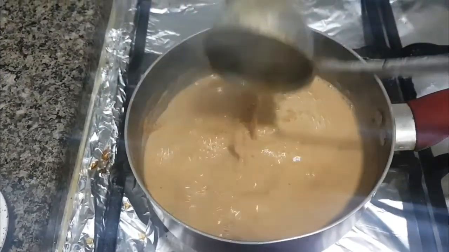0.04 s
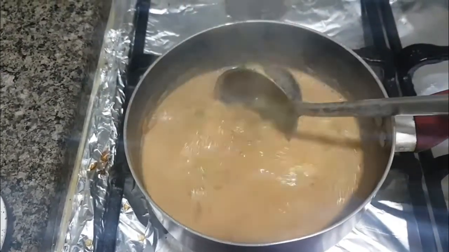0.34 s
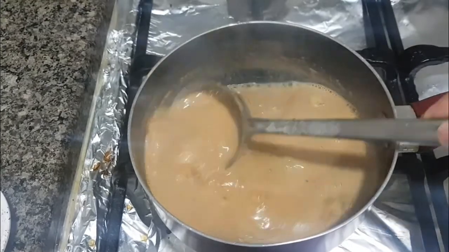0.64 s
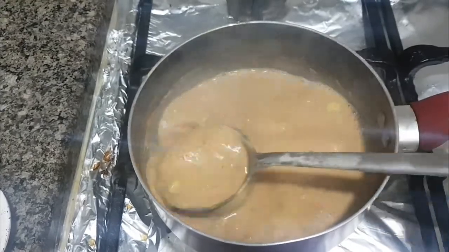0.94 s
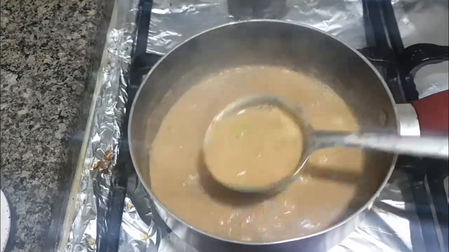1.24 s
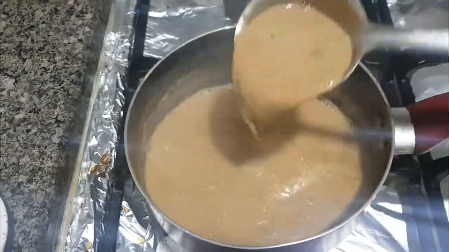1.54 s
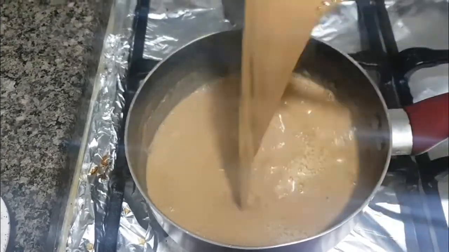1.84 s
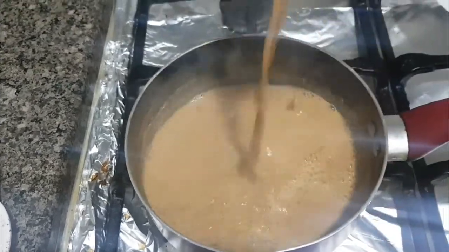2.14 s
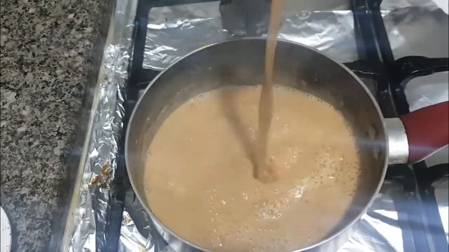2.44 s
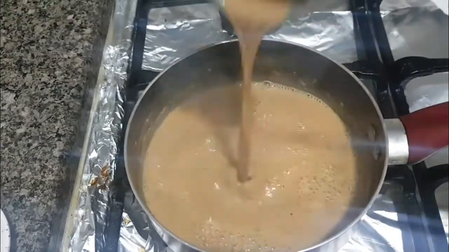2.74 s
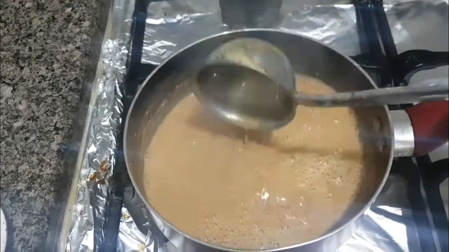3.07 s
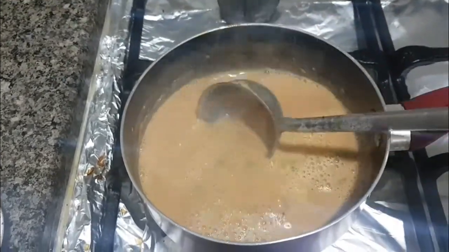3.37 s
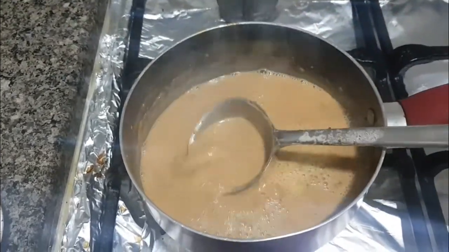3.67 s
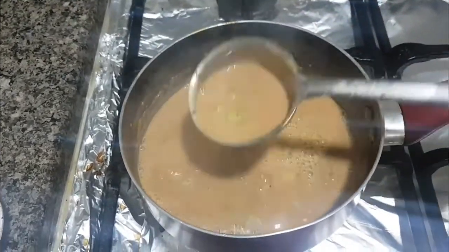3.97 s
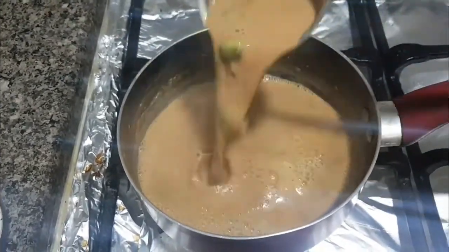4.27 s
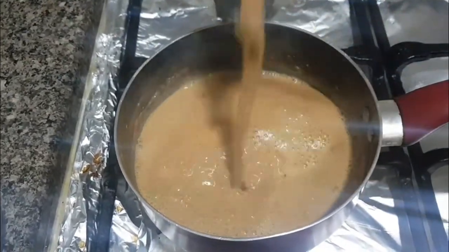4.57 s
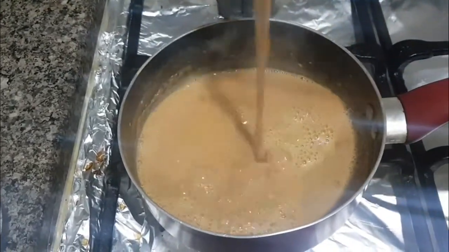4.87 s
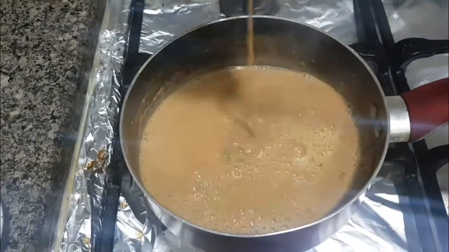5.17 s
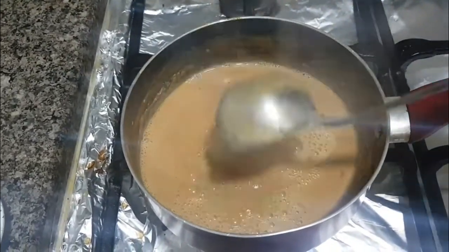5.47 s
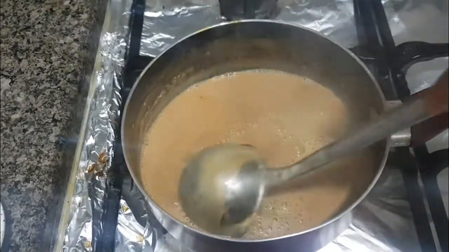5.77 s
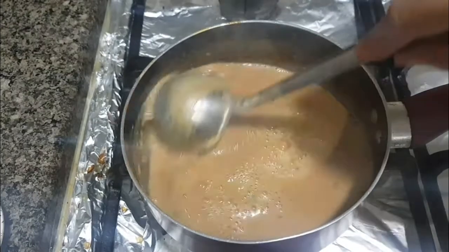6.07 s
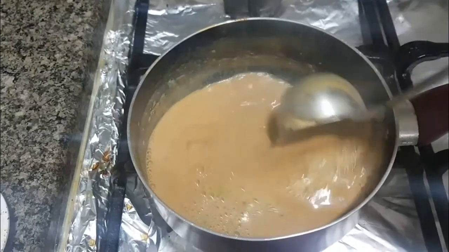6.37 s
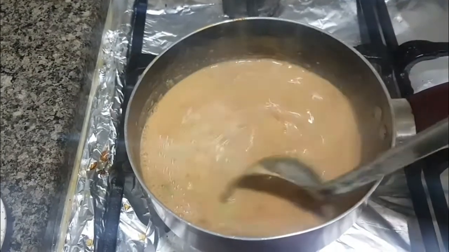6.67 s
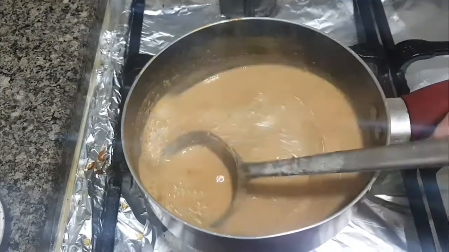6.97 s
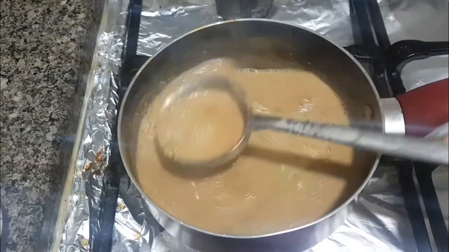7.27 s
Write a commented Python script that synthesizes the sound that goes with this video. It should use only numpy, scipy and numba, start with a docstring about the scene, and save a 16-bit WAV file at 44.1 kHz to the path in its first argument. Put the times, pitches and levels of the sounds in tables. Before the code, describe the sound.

A steel ladle pours liquid back into a pan twice with splashes and plops, then clinks and scrapes, over a faint hum.

```python
"""Milky tea in a hot pan, from a microphone pair just above the stove in a small kitchen.
Over a low hum and the burner's rush, a steel ladle dribbles its last drops and sloshes through the tea.
Near 1.8 s and again near 4.4 s it pours from a height: drops slap the surface and burst into spray,
trapped air fizzes and plops. From 5.9 s the ladle knocks on the pan and its rim scrapes round it,
the tea sloshing behind the bowl."""
import sys
import numpy as np
from scipy import signal
from scipy.fft import rfft, irfft, next_fast_len
from scipy.io import wavfile
from scipy.ndimage import uniform_filter1d
from numba import njit

SR = 44100
rng = np.random.default_rng(int(sys.argv[2]) if len(sys.argv) > 2 else 0)


def waveform_to_disk(signal):
    """Save audio, clipped to [-1, 1], as 16-bit WAV at the path in sys.argv[1]."""
    frames = np.transpose(np.atleast_2d(signal))
    scaled = np.clip(frames, -1, 1) * 32767
    samples = np.round(scaled).astype(np.int16)
    wavfile.write(sys.argv[1], SR, samples)


N = 327001
T = np.arange(N) / SR

# Levels in the tables are relative, ahead of the mix.
# steady hum in the kitchen: (frequency [Hz], level [dB])
HUM = [(44, -49), (100, -50.5), (186, -67), (200, -66.5), (241, -77)]
# spectrum of burner and room air: (frequency [Hz], level [dB])
ROOM_TONE = [(20, -10), (40, -1), (70, 15.5), (90, 8.5), (125, 4), (200, -6), (290, 1), (400, -8.5),
             (800, -7.5), (1200, -11.5), (1900, -24), (2800, -36.5), (6000, -49)]
# a last dribble, then two pours, loudest with the ladle highest:
# (start [s], crest [s], end [s], patter [dB], crackle [dB], spray [dB])
POURS = [(0.014, 0.095, 0.12, -47, -49.5, -52), (1.782, 2.443, 3.04, -47, -54.5, -57.5),
         (4.393, 5.127, 5.347, -46.5, -52, -54)]
# air resonances between tea and pan wall: (frequency [Hz], width [Hz], gain [dB])
PAN_AIR_MODES = [(342, 110, -23), (470, 16.5, 10), (927, 160, -2), (2960, 280, 5.5)]
# the biggest drops hitting the tea: (time [s], slap pitch [Hz], slap [dB], spray [dB])
DROPS = [(0.0386, 1460, -36, -50), (0.069, 1190, -28.5, -47), (0.1082, 1030, -24, -37),
         (.447, 1050, -19, -47), (0.465, 1020, -14.5, -40), (.7874, 790, -33, -70),
         (1.1113, 1980, -31.5, -73), (1.755, 1280, -34.5, -49), (1.8033, 884, -26, -43),
         (1.8789, 1300, -29.5, -35.5), (1.9125, 1530, -31, -34.5), (1.9639, 2120, -25, -37),
         (2.1744, 940, -29, -62), (2.214, 1430, -26, -57), (2.3025, 1300, -30, -29),
         (2.3578, 1090, -26.5, -37), (2.4296, 1060, -24.5, -31), (2.4778, 740, -16.5, -36),
         (2.5257, 796, -22.5, -36), (2.652, 1000, -30, -34), (2.668, 980, -23.5, -41),
         (2.7193, 2000, -36, -29.5), (2.8, 845, -23, -25.5), (2.9338, 1060, -23.5, -43),
         (2.9771, 1200, -29, -43.5), (3.0005, 1040, -32, -60), (3.0347, 1137, -30, -42.5),
         (4.3805, 800, -23, -35), (4.423, 1030, -23, -60), (4.4759, 2940, -23, -45),
         (4.484, 880, -23, -36.5), (4.5549, 760, -22, -28.5), (4.7624, 746, -22, -49),
         (4.8136, 1460, -20, -29.5), (5.0408, 1410, -28.5, -36), (5.1019, 1230, -16, -27.5),
         (5.1264, 970, -26, -51), (5.152, 1090, -23, -38), (5.1848, 820, -22.5, -53),
         (5.2114, 1460, -23.5, -36), (5.2298, 1160, -24.5, -58), (5.2568, 890, -37, -40.5),
         (5.3176, 1160, -30.5, -57), (5.3804, 1300, -26.5, -35.5), (5.403, 1350, -33, -41),
         (5.4364, 1370, -26.5, -35.5), (5.5084, 2400, -30, -47.5)]
# clouds of tiny bubbles dragged under: (time [s], length [s], pitch [Hz], level [dB])
FIZZ = [(0.079, 0.039, 4650, -52), (1.108, 0.028, 3000, -68.5), (1.136, 0.13, 2630, -74),
        (1.783, 0.096, 4930, -57.5), (2.063, 0.046, 1860, -54.5), (2.225, 0.091, 3660, -54),
        (2.48, 0.047, 5800, -50.5), (2.692, 0.041, 7600, -50), (3.536, 0.14, 5630, -83),
        (4.4, 0.018, 3700, -52.5), (4.461, 0.028, 3420, -48), (4.618, 0.019, 4000, -48.5),
        (4.761, 0.053, 3200, -47), (4.911, 0.025, 4570, -48.5), (5.013, 0.032, 1620, -52),
        (5.506, 0.02, 2730, -59.5)]
# large air pockets ringing: (time [s], pitch [Hz], level [dB], t60 [s])
PLOPS = [(.465, 792, -21.5, 0.036), (.484, 710, -42, 0.088), (.495, 611, -34.5, 0.2),
         (0.731, 365, -39, 0.08), (0.858, 301, -39, 0.29), (2.48, 445, -29, 0.077),
         (2.8, 402, -27.5, 0.039), (4.381, 432, -29, 0.077), (4.425, 472, -29.5, 0.057),
         (4.558, 700, -36, 0.045), (4.763, 384, -26.5, 0.042), (5.1, 296, -38, 0.055),
         (5.185, 465.4, -34, 0.24), (6.1, 243, -49, 0.11), (6.735, 684, -38.5, 0.18)]
# sweeps of the bowl through the tea: (start [s], crest [s], end [s], gurgle [dB], lapping [dB])
SWEEPS = [(0.636, .87, 0.95, -46.5, -51.5), (3.446, 3.58, 3.9, -51.5, -54.5),
          (5.953, 6.077, 6.18, -44.5, -56), (6.28, 6.48, 6.8, -45, -47), (6.675, 6.94, 7.24, -41.5, -51.5)]
# ladle against pan: (time [s], contact [dB], contact pitch [Hz], wall ring [dB], crack [dB])
KNOCKS = [(5.8892, -11.5, 1250, -24, -25), (6.2663, -22.5, 1430, -49, -45), (6.3049, -35, 1480, -37, -47),
          (6.377, -12.5, 1250, -32, -30)]
# modes of pan and ladle: (frequency [Hz], level [dB], t60 [s])
STEEL_MODES = [(494, 1.5, 0.2), (700, -16, 0.23), (862, 4, 0.17), (995, 8.5, 0.062), (1120, -23, .12),
               (1237, 6.5, 0.11), (1500, -1, 0.11), (1650, -12, 0.1), (1780, -8, 0.073), (2040, 4, 0.066),
               (2130, -4, 0.094), (2330, -13, 0.18), (2750, -17, 0.18), (3100, -7, 0.1), (3410, -14, 0.092),
               (4360, -20, 0.2), (5240, -33, 0.094), (7180, -16, 0.2), (7300, -26, 0.2)]
# strokes of the rim over the pan: (start [s], end [s], body [dB], fade [dB/s], grit [dB re body],
# wall drone [dB re body], overtones [dB re body], bowl resonance [Hz], glide [Hz/s])
STROKES = [(5.996, 6.125, -38, -15, -21, -27, -12.5, 908, 1400),
           (6.266, 6.317, -30.5, 13, -13, -21, -11, 1462, -500),
           (6.378, 6.588, -33, 16.5, -8, -5, -22, 1428, -650),
           (6.66, 6.762, -34, 91, -10, -12.5, -20, 1587, -900),
           (6.823, 6.906, -44, 0, -12, -9, -1, 964, 500),
           (6.914, 6.977, -37.5, 109, -16, -7.5, -5, 1090, -1300)]
# modes of the dragged bowl, three low ones, then overtones:
# (frequency [multiple of the bowl resonance], width [Hz], level [dB])
BOWL_MODES = [(.8, 125.4, 6), (0.999, 120, 14.5), (1.13, 129, 1), (1.42, 197, 2), (1.95, 160, -0.5),
              (2.72, 198, -17.5), (3.05, 202, -34)]
# rasp of steel on steel: (frequency [Hz], level [dB])
GRIT_SPECTRUM = [(1500, -26), (2400, 1.5), (3600, -3.5), (4500, -4), (5700, -12), (7300, -12), (9000, -16),
                 (12000, -18), (16000, -26)]
# mismatch of the microphone pair: (frequency [Hz], left minus right [dB])
MIC_MISMATCH = [(45, 0), (100, 3), (200, 0), (400, -1.5), (650, 3), (1400, 0.5), (3000, 1), (4500, 0.5),
                (6000, -4.5), (8500, 1), (12000, -3), (16000, -1)]
# self-noise of the microphones: (frequency [Hz], level [dB])
MIC_HISS = [(100, -27), (3000, 4), (6500, 1.5), (7700, 9.5), (9500, 4.5), (12000, 8), (16000, 2)]


def amp(db):
    """Decibels to gain."""
    return 10 ** (np.asarray(db) / 20)


def unit(x):
    """Scale to rms 1."""
    return x / np.sqrt(np.mean(x ** 2))


def even(x, span_s):
    """Hold the rms near 1 over span_s, keeping the faster grain."""
    size = int(span_s * SR) + 1
    power = uniform_filter1d(uniform_filter1d(x ** 2, size), size)
    return x / np.sqrt(np.abs(power) + 1e-4 * np.mean(x ** 2))


def decay(t, t60):
    """Envelope that falls 60 dB in t60 seconds."""
    return np.exp(-np.log(1000) * t / t60)


def colour(x, points):
    """Filter by a curve of (frequency [Hz], gain [dB])."""
    hz, db = np.transpose(points)
    size = next_fast_len(x.shape[-1] + 4096)
    bins_hz = np.maximum(np.fft.rfftfreq(size, 1 / SR), 1)
    gain = amp(np.interp(np.log(bins_hz), np.log(hz), db))
    return irfft(rfft(x, size) * gain, size)[..., :x.shape[-1]]


def band(x, lo_hz, hi_hz, order=2):
    """Causal band-pass."""
    return signal.sosfilt(signal.butter(order, [lo_hz, hi_hz], "band", fs=SR, output="sos"), x + 1e-18)


def add(out, s, sound):
    """Mix a short sound in at s seconds."""
    i = max(int(s * SR), 0)
    out[i:i + len(sound)] += sound[:N - i]


@njit
def moving_band(x, hz, width_hz):
    """State-variable band-pass whose centre may move every sample."""
    out, band_state, low_state = np.empty(len(x)), 0., 0.
    for i in range(len(x)):
        g, damping = np.tan(np.pi * hz[i] / SR), width_hz / hz[i]
        passed = (band_state + g * (x[i] + 1e-18 - low_state)) / (1 + g * (g + damping))
        band_state = 2 * passed - band_state
        low_state += 2 * g * passed
        out[i] = damping * passed
    return out


def resonate(x, hz, *widths_hz):
    """One resonance per width, in series, with gain 1 at the centre."""
    for width in widths_hz:
        x = moving_band(x, hz * np.ones(N), float(width))
    return x


@njit
def grains(times, hz, size, cycles, glide):
    """Sine bursts that swell for some cycles and die; glide bends their pitch upward."""
    out = np.zeros(N)
    for k in range(len(times)):
        start, rise = int(times[k] * SR), cycles * SR / hz[k]
        for i in range(max(0, -start), min(int(9 * rise), N - start)):
            u = i / rise
            phase = 2 * np.pi * cycles * u * (1 + glide * u / 9)
            out[start + i] += size[k] * u * np.exp(1 - u) * np.sin(phase)
    return out


def shower(times, lo_hz, hi_hz, cycles, scatter_db, glide):
    """Grains of random pitch and size at the given times."""
    pitch_draw, size_draw = rng.random((len(times), 2)).T
    size = amp(scatter_db * np.minimum(-np.log(1 - size_draw), 4))
    return grains(times, lo_hz * (hi_hz / lo_hz) ** pitch_draw, size, cycles, float(glide))


def moments(count, jitter):
    """Times spread over the whole scene, each off the beat by about jitter periods."""
    return (np.arange(count) + jitter * rng.standard_normal(count)) * N / SR / count


def ticks(times, db, rise_s, lo_hz, hi_hz):
    """Bright noise bursts that swell for rise_s and die."""
    out, u = np.zeros(N), T[:SR // 80] / rise_s
    shape = u * np.exp(1 - u)
    for s, gain in zip(times, amp(db)):
        crack = band(rng.standard_normal(len(u)) * shape, lo_hz, hi_hz)
        add(out, s, gain * crack * np.sqrt(np.sum(shape ** 2) / np.sum(crack ** 2)) / 2)
    return out


def swell(starts, crests, ends, levels_db, rise_db, fall_db, edge_s):
    """Gain that climbs steadily to each crest, then falls ever faster; edge_s fades both ends."""
    gain = np.zeros(N)
    for start, crest, end, db in zip(starts, crests, ends, levels_db):
        before = np.clip((crest - T) / (crest - start), 0, 1)
        after = np.maximum((T - crest) / (end - crest), 0)
        gate = np.clip(1 + np.minimum(T - start, end - T) / edge_s, 0, 1)
        gain += gate * amp(db - rise_db * before - fall_db * after ** 2)
    return gain


def stereo_noise(size, spread_hz):
    """Diffuse sound: alike at both microphones in the bass, unrelated in the treble."""
    mid, side = rng.standard_normal((2, size))
    side = signal.sosfilt(signal.butter(1, spread_hz, "high", fs=SR, output="sos"), side)
    return (mid + np.array([[1], [-1]]) * side) / np.sqrt(2)


def room_tone():
    """A wavering low hum and the soft rush of the burner below the microphones."""
    hum = sum(amp(db) * np.sqrt(2) * np.sin(2 * np.pi * (hz * T + rng.random())) for hz, db in HUM)
    rumble = amp(-54) * unit(band(rng.standard_normal(N), lo_hz=40.8, hi_hz=49.5, order=3))
    rush = amp(-53) * unit(colour(stereo_noise(N, spread_hz=760), ROOM_TONE))
    return hum + rumble + rush


def stream():
    """The stream breaks into drops that patter, glug and spray, rising as the ladle lifts."""
    impacts = moments(700, jitter=1)
    patter = shower(impacts, lo_hz=664, hi_hz=1800, cycles=0.43, scatter_db=5.5, glide=0.39)
    glug_times = moments(1400, jitter=2)
    glugs = shower(glug_times, lo_hz=252.7, hi_hz=1334, cycles=1.17, scatter_db=4, glide=0.18)
    crackle_times = np.append(impacts, moments(4000, jitter=1.8))
    crackle = shower(crackle_times, lo_hz=2380, hi_hz=7100, cycles=0.38, scatter_db=8, glide=0.18)
    spray_times = np.append(impacts, moments(4000, jitter=2))
    spray = shower(spray_times, lo_hz=7400, hi_hz=15400, cycles=0.41, scatter_db=7.5, glide=0)
    start, crest, end, patter_db, crackle_db, spray_db = np.transpose(POURS)
    edge_s, lead_s = 0.057, 0.06  # the stream's thin leading edge hisses before the bulk lands
    body = even(unit(patter) + amp(-2.5) * unit(glugs), 0.11)
    crackle, spray = even(crackle, 0.043), even(spray, 0.13)
    body *= swell(start, crest, end, patter_db, rise_db=8, fall_db=7, edge_s=edge_s)
    crackle *= swell(start, crest, end, crackle_db, rise_db=7, fall_db=11, edge_s=edge_s)
    spray *= swell(start - lead_s, crest, end, spray_db, rise_db=6.5, fall_db=5, edge_s=edge_s)
    return amp(-0.5) * (body + crackle + spray)


def pan_air(splash):
    """Splashes ring the air between the tea and the pan wall."""
    return splash + sum(amp(db) * resonate(splash, hz, width) for hz, width, db in PAN_AIR_MODES)


def drops():
    """Each big drop slaps the tea, traps a ringing bubble and throws spray, which patters down."""
    s, hz, slap_db, spray_db = np.transpose(DROPS)
    slaps = grains(s - 0.0003, hz, amp(slap_db - 2), cycles=0.25, glide=0.)
    bubbles = grains(s + 0.00096, 0.92 * hz, amp(slap_db - 18.5), cycles=1.5, glide=0.11)
    spray = ticks(s - 0.0004, spray_db + 5, rise_s=0.00055, lo_hz=2400, hi_hz=12700)
    fallout = ticks(s - 0.001, spray_db - 4.5, rise_s=0.0018, lo_hz=2800, hi_hz=12800)
    return slaps + bubbles + spray + fallout


def fizz():
    """Tiny bubbles dragged under the surface sound in short clouds."""
    out = np.zeros(N)
    for s, length, hz, db in FIZZ:
        times = s + length * rng.random(size=150)
        cloud = shower(times, lo_hz=hz / 1.21, hi_hz=hz * 1.13, cycles=0.43, scatter_db=8, glide=0.11)
        out += amp(db + 0.5) * cloud / np.sqrt(np.sum(cloud ** 2) / (length * SR))
    return out


def plops():
    """Large pockets of air ring singly, rising slightly in pitch."""
    out, t = np.zeros(N), T[:SR // 3]
    attack = 1 - np.exp(-t / 0.00063)
    for s, hz, db, t60 in PLOPS:
        tone = np.sin(2 * np.pi * hz * t * (1 + 0.09 * t))
        add(out, s, amp(db - 2) * attack * decay(t, t60) * tone)
    return out


def slosh():
    """The moving bowl folds air under the tea: gurgles and lapping grow with speed, then settle."""
    gurgle_times = moments(1500, jitter=0.91)
    gurgle = shower(gurgle_times, lo_hz=191.6, hi_hz=450, cycles=1.04, scatter_db=1.5, glide=0.14)
    lap_times = moments(3000, jitter=2)
    lap = shower(lap_times, lo_hz=473, hi_hz=1300, cycles=0.41, scatter_db=2.5, glide=0.22)
    start, crest, end, gurgle_db, lap_db = np.transpose(SWEEPS)
    gurgle_gain = swell(start, crest, end, gurgle_db, rise_db=2, fall_db=22.5, edge_s=0.066)
    lap_gain = swell(start, crest, end, lap_db, rise_db=6, fall_db=36, edge_s=0.066)
    return amp(-6) * (even(gurgle, 0.0059) * gurgle_gain + even(lap, 0.027) * lap_gain)


def knocks():
    """The ladle hits the pan: a hard contact pulse, a crack and the ring of the wall."""
    s, contact_db, hz, ring_db, crack_db = np.transpose(KNOCKS)
    push = np.zeros(N)
    push[(s * SR).astype(int)] = amp(ring_db - 10.5)
    contact = grains(s, hz, amp(contact_db), cycles=0.56, glide=0.)
    crack = ticks(s, crack_db, rise_s=0.00077, lo_hz=1810, hi_hz=5900)
    return contact + crack + steel_ring(push)


def steel_ring(push):
    """Pan and ladle ring, damped by the tea and the hand."""
    t = T[:SR // 2]
    ring = sum(amp(db) * decay(t, t60) * np.sin(2 * np.pi * hz * t) for hz, db, t60 in STEEL_MODES)
    return signal.fftconvolve(push, ring)[:N]


def strokes():
    """Each stroke bites, fades or grows, and lets go: four layer gains and the bowl's pitch."""
    attack_s, release_s = 0.00215, 0.0044
    gains, bowl_hz = np.zeros((4, N)), np.zeros(N)
    for start, end, db, fade_db_per_s, grit_db, wall_db, overtone_db, hz, glide_hz_per_s in STROKES:
        age = np.clip(T - start, 0, end - start)
        gate = np.clip(1 + (T - start) / attack_s, 0, 1) * np.exp(-np.maximum(T - end, 0) / release_s)
        gains += np.outer(amp([0, grit_db, wall_db, overtone_db]), gate * amp(db - fade_db_per_s * age))
        bowl_hz = np.where((gate > 0) | (bowl_hz == 0), hz + glide_hz_per_s * age, bowl_hz)
    return gains, bowl_hz


def scrape():
    """The rim sticks and slips in a rough stutter; the bowl's modes sink as it dips into the tea."""
    times = moments(1150, jitter=0.3)
    slips = np.zeros(N)
    slips[(times * SR).astype(int) % N] = amp(3.4 * rng.standard_normal(len(times)))
    slip_tails = signal.lfilter([1], [1, -np.exp(-1 / (0.0062 * SR))], slips + 1e-18)
    rasp = slip_tails * rng.standard_normal(N)
    push = slips + 0.043 * rasp
    (body_gain, grit_gain, wall_gain, overtone_gain), bowl_hz = strokes()
    modes = [amp(db) * even(resonate(push, ratio * bowl_hz, width, 4 * width), 0.018)
             for ratio, width, db in BOWL_MODES]
    body = even(unit(sum(modes[:3])) + amp(-14) * unit(steel_ring(push)), 0.021)
    overtones = unit(sum(modes[3:]))
    wall_hz = 705 * (bowl_hz / 1400) ** 0.19  # the wall's drone sinks a little with the bowl
    wall = even(resonate(push, wall_hz, 92, 140), 0.019)
    grit = even(colour(rasp, GRIT_SPECTRUM), 0.0066)
    return amp(-6) * (body * body_gain + overtones * overtone_gain + wall * wall_gain + grit * grit_gain)


def kitchen(x, near_db, near_t60, room_db, room_t60):
    """Close reflections from pan, foil and wall reach the pair, then the small room's short tail."""
    t = T[:SR // 2]
    echo = 0
    for db, t60, delay_s in (near_db, near_t60, 0.002), (room_db, room_t60, 0.006):
        shape = decay(t, t60) * (t > delay_s)
        echo += amp(db) * shape / np.sqrt(np.sum(shape ** 2)) * stereo_noise(len(t), spread_hz=850)
    lag_s = np.array([[0], [0.00002]])  # the left microphone is nearer
    direct = np.exp(-2j * np.pi * np.fft.rfftfreq(SR, 1 / SR) * lag_s)
    paths = direct + rfft(echo, SR)
    # the many paths smear the sound in time but favour no broad band
    power = np.abs(paths) ** 2
    paths /= np.sqrt(uniform_filter1d(power, size=50) / power.mean())
    return signal.fftconvolve(x[None], irfft(paths, SR)[:, :len(t)], axes=1)[:, :N]


def scene():
    """Tea and steel from just above the stove, with the kitchen's echo and room tone."""
    splash = amp(-3.5) * pan_air(drops() + stream())
    stove = splash + fizz() + plops() + slosh() + knocks() + scrape()
    return kitchen(stove, near_db=1, near_t60=0.045, room_db=-4, room_t60=0.33) + room_tone()


def record(dry):
    """A slightly mismatched microphone pair with faint hiss, cut off above 16.2 kHz."""
    pair = [colour(x, [(hz, side * db / 2) for hz, db in MIC_MISMATCH]) for x, side in zip(dry, (1, -1))]
    hiss = amp(-70.5) * unit(colour(rng.standard_normal((2, N)), MIC_HISS))
    top_cut = signal.ellip(10, 0.2, 70, 16200, fs=SR, output="sos")
    return signal.sosfilt(top_cut, np.array(pair) + hiss)


dry = scene()
out = record(dry)
waveform_to_disk(out)
```